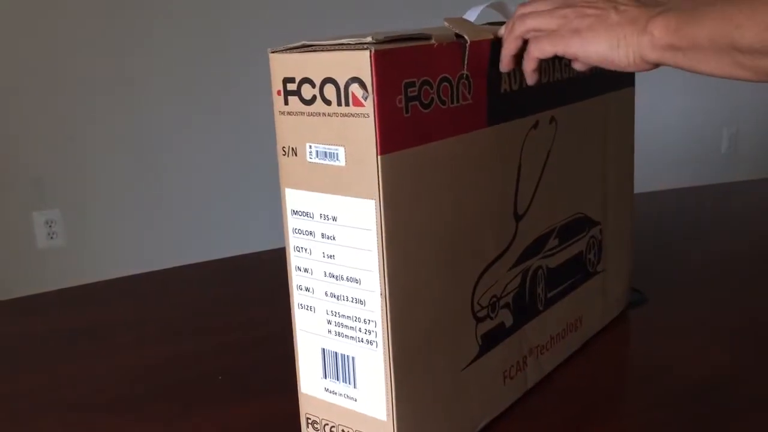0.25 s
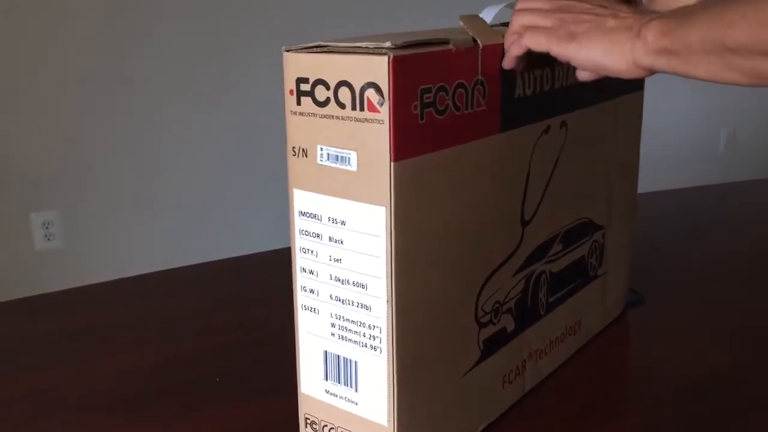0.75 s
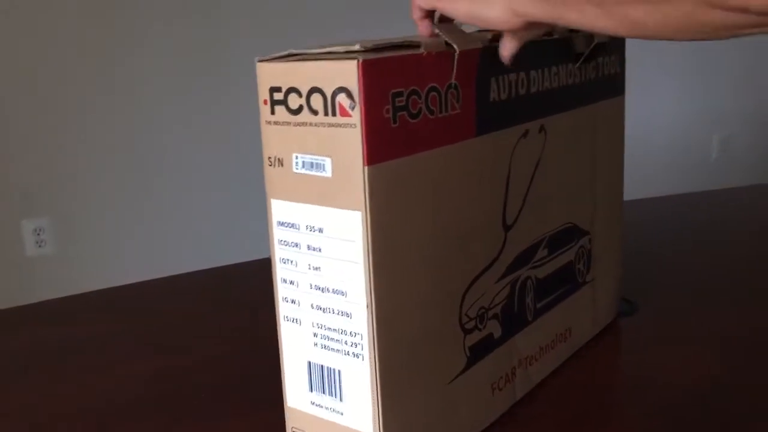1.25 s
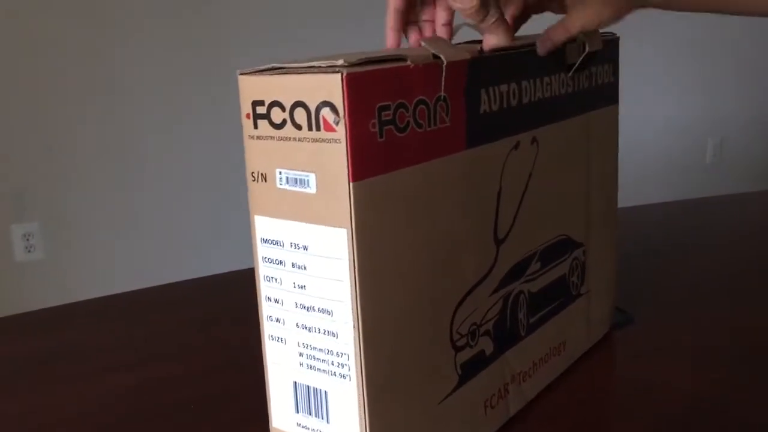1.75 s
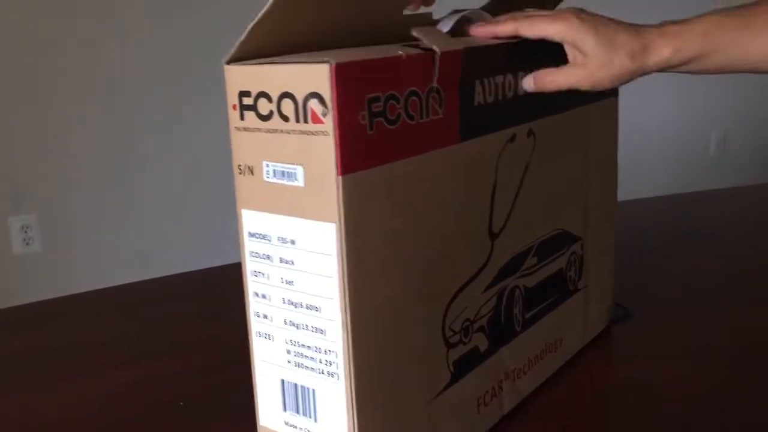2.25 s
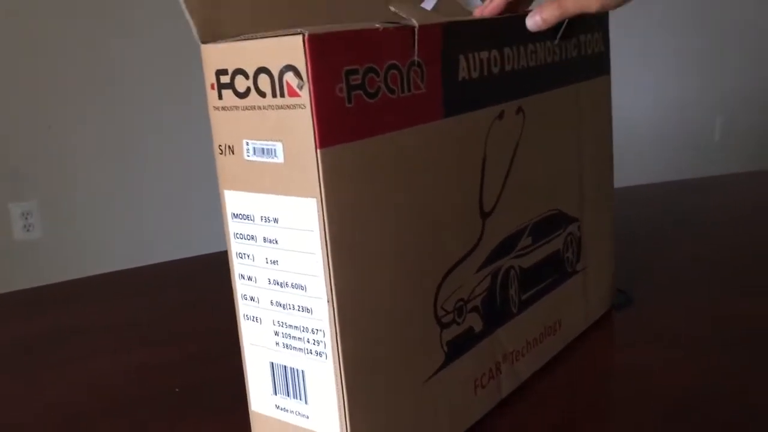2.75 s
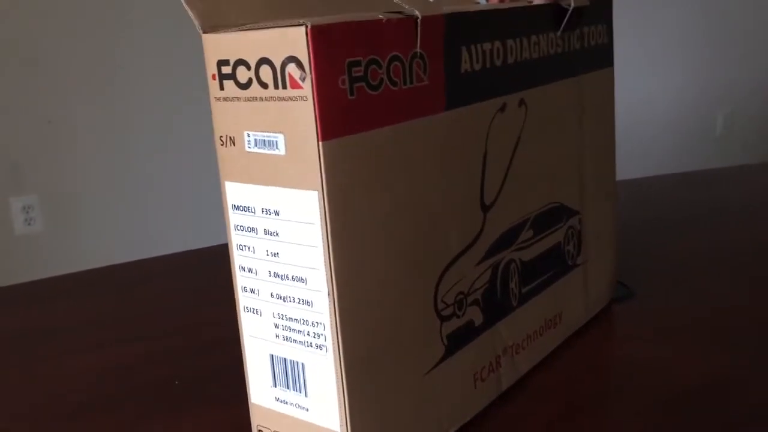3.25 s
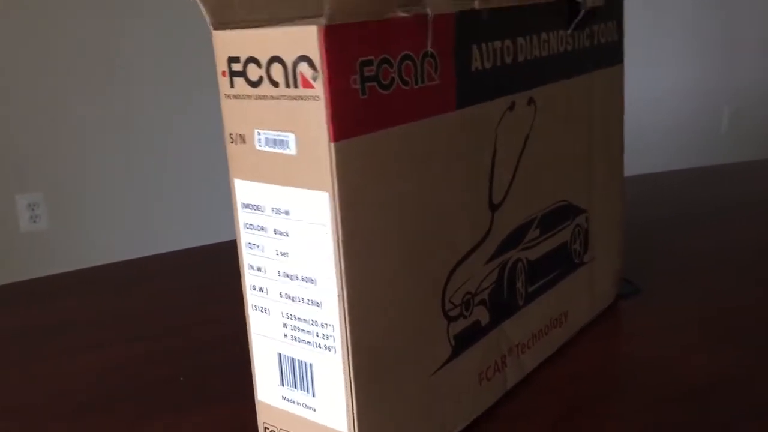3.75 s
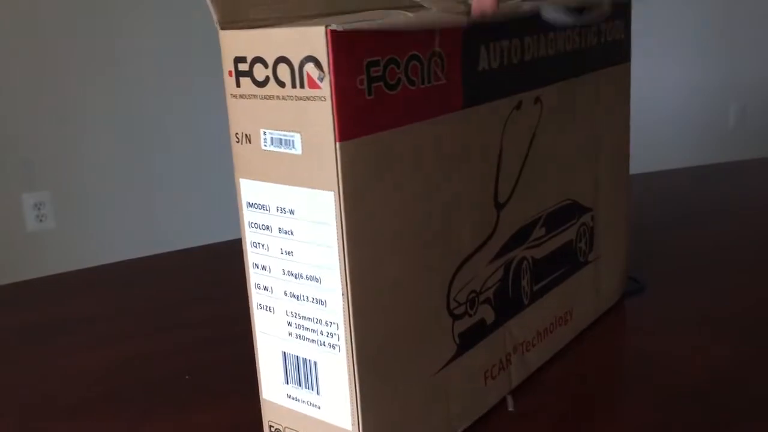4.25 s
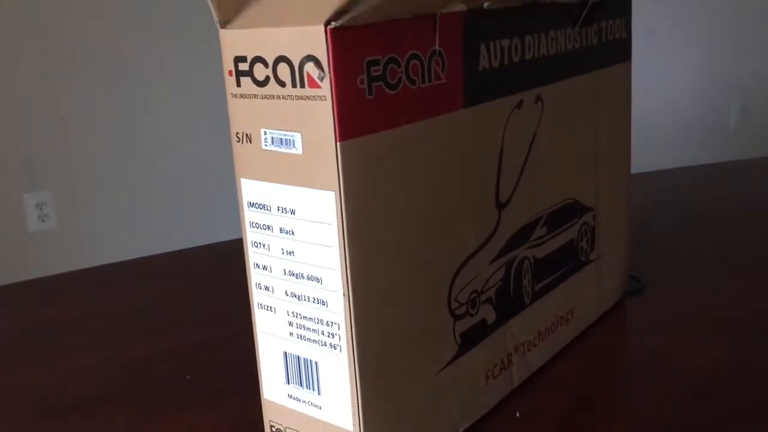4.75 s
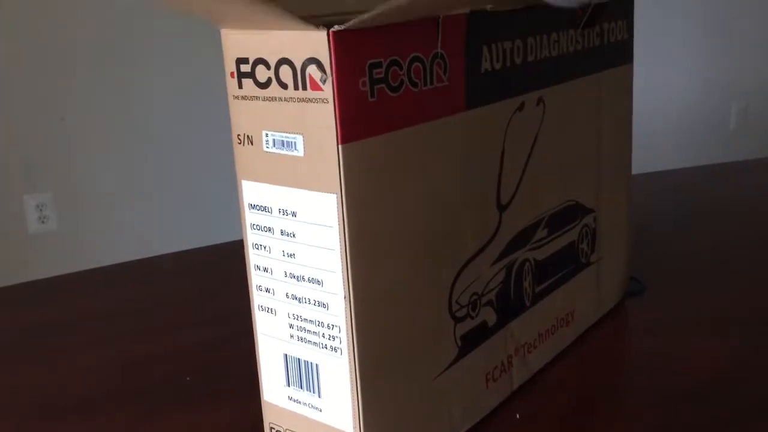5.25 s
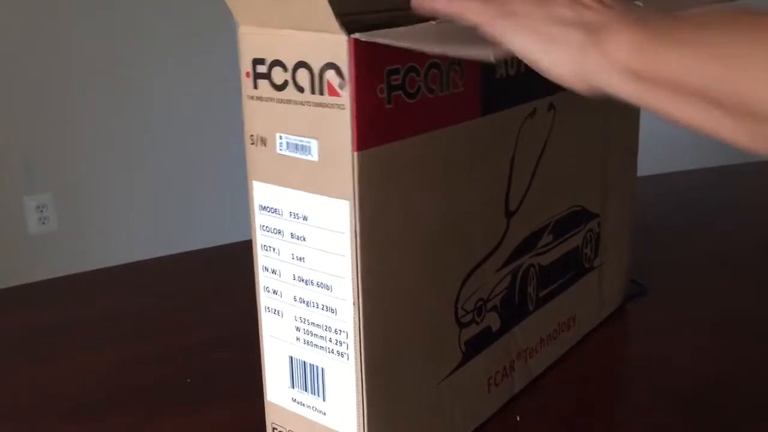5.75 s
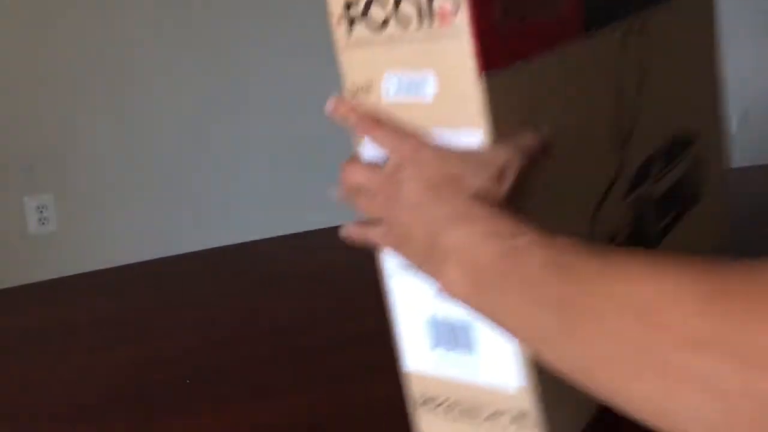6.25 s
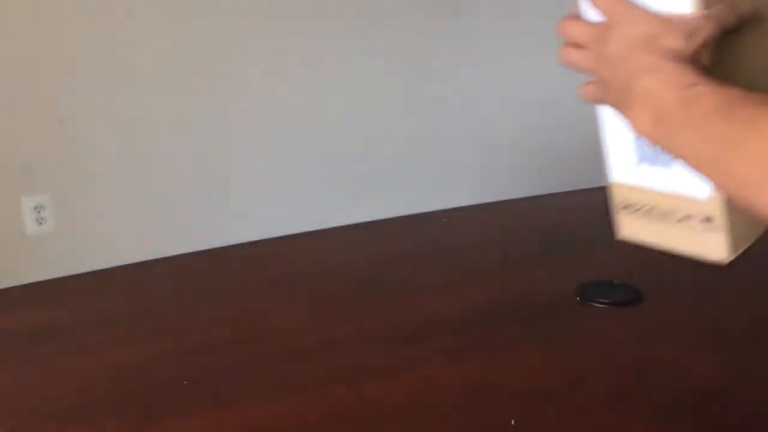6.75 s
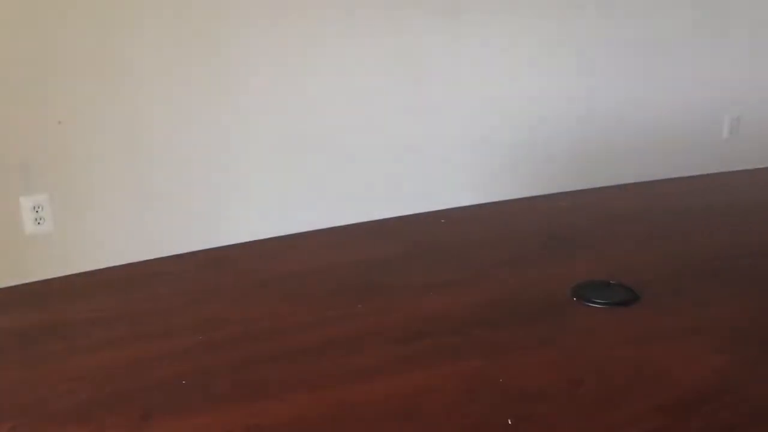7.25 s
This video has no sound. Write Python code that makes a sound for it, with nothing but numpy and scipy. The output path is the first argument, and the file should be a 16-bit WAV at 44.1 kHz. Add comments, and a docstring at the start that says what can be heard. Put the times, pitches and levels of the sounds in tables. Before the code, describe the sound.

Cardboard box being opened close by: faint fumbling, popping tab, rubbing and slapping flaps, then a droning scrape across a table and a final thump.

```python
"""Opening a cardboard carton

Hands open a large carton on a wooden table in a small, bare room. The tuck tab is torn free, flaps
scrape, creak and slap back, then the carton is dragged off the table. Blows and rubs drive its hollow
panels, stiff corrugated board and paper fibres, built from ringing tones, tiny clicks and coloured noise.
Levels in the tables are starting points: each layer adds its own trim."""
import sys
import numpy as np
from scipy import signal
from scipy.fft import rfft, irfft
from scipy.io import wavfile

SR = 44100
rng = np.random.default_rng(int(sys.argv[2]) if len(sys.argv) > 2 else 0)


def wrap_up_sound(samples):
    """Save the sound to the file named by the first command line argument, as 16-bit audio."""
    columns = np.atleast_2d(samples).T
    # keep every value between -1 and 1, then stretch to whole-number steps
    tamed = np.clip(columns, -1, 1)
    steps = np.round(tamed * 32767).astype(np.int16)
    wavfile.write(sys.argv[1], SR, steps)


N = 330309
TIME = np.arange(N) / SR
TOP_HZ = 15600  # nothing is heard above this pitch

# the board buckles or the tab tears: start_s, level_db, fibres_against_board_db, crumple_length_s,
# spot_pitch_hz
CRACK_EVENTS = [(0.102, -36, -25, .005, 970), (0.156, -31, -29, 0.0043, 1650),
                (0.234, -38, -24, 0.007, 860), (0.349, -30.5, -18, 0.0094, 1550),
                (0.571, -23.5, -7, 0.01, 620), (0.599, -19, -3, 0.004, 1460), (0.718, -25, 0, 0.0064, 950),
                (0.637, -27, -8, 0.0036, 1400), (0.752, -19.5, -7, 0.0043, 1560),
                (0.94, -23, -4, 0.0051, 1900), (0.989, -19, 0, 0.0073, 786), (1.124, -15, -1, 0.007, 1300),
                (1.143, -11, 0, 0.011, 1690), (1.263, -15, 1, 0.0077, 1710), (1.49, -15, -9.5, 0.017, 1030),
                (1.765, -18, -13, 0.017, 990), (1.93, -16.5, -7, 0.0083, 1580),
                (1.978, -5, -4, 0.012, 1635), (2.091, -24, -13, 0.008, 1290),
                (2.119, -3.5, -3, 0.0087, 1060), (2.15, -7.5, -7, 0.013, 1520),
                (2.429, -18.5, -3.5, 0.0048, 1260), (2.661, -17.5, -9, 0.0045, 1340),
                (3.045, -21, -20, 0.011, 1670), (3.077, -35, -18, .012, 1800),
                (3.138, -12, -12, 0.0056, 870), (3.262, -16.5, 2.5, 0.0037, 2230),
                (3.503, -6, -17, 0.03, 1620), (3.528, -1, -8, 0.003, 1580), (3.769, -14, -10, 0.0034, 2000),
                (3.91, -33, -4, 0.0048, 1710), (3.928, -19, -11, 0.0067, 1550),
                (4.121, -19, -7, 0.0026, 3610), (4.414, -27, -10, 0.006, 1350),
                (4.427, -19.5, -15, 0.0074, 790), (4.443, -16.5, -6, 0.012, 800),
                (4.567, -16.5, -6, 0.0058, 820), (4.606, -12, -6, 0.012, 496), (4.628, -9, -7, 0.011, 477),
                (4.688, -13.5, -20, 0.0086, 930), (4.794, -13, -23, 0.018, 1740),
                (4.913, -22.5, -13, 0.0089, 930), (4.956, -18.5, -4.5, 0.0035, 820),
                (5.054, -21, -17, 0.0098, 860), (5.126, -25, -5, 0.0093, 1890),
                (5.16, -24, -12, 0.003, 755), (5.571, -16.5, -6, 0.0043, 960),
                (5.633, -11, -10, 0.0039, 2000), (5.812, -1.5, -5.5, 0.0056, 555),
                (5.842, -5.5, -15, 0.0078, 690), (6.11, -16.5, -19, 0.0065, 470)]
# a finger or palm bumps or presses a hollow panel: start_s, level_db, panel_pitch_hz, push_length_s
THUMP_EVENTS = [(0.0, -22.5, 177, 0.0058), (0.046, -32, 160, 0.0042), (0.301, -30, 287, 0.0026),
                (0.336, -28.5, 240, 0.01), (0.609, -28, 208, 0.0023), (1.006, -13.5, 186, 0.0068),
                (1.296, -14.5, 206, 0.004), (1.745, -10, 144, 0.021), (2.249, -14, 230, 0.0099),
                (2.283, -12.5, 160, 0.0023), (2.718, -12.5, 130, 0.015), (2.778, -12, 160, 0.0053),
                (3.232, -6, 234, 0.0039), (3.519, -5, 210, .002), (3.543, -5, 152, 0.0098),
                (3.81, -16, 195, 0.014), (3.858, -10.5, 276, 0.012), (4.44, -17, 134, 0.0082),
                (4.624, -11, 238, 0.0078), (4.884, -16, 267, 0.014), (4.955, -10.5, 229, 0.0024),
                (5.467, -14, 225, 0.00091), (5.489, -12, 249, .004), (5.54, -10, 243, 0.03),
                (5.644, 0.5, 308, 0.0018), (6.124, -5, 226, 0.0031), (6.279, -7.5, 254, 0.0014),
                (6.331, -9, 287, 0.0028), (7.074, -0.5, 251, 0.02)]
# a flap or edge slaps flat: start_s, level_db, flap_pitch_hz
SLAP_EVENTS = [(5.64, -1.5, 903), (5.688, -4, 920), (5.792, -6.5, 804), (5.822, 2, 573), (5.885, 0, 700),
               (7.472, 0, 620)]


def blows():
    """Cracks, thumps and slaps share the carton's body and differ in how they drive it."""
    out = np.zeros(N)
    # where a crack lands shifts the pitch of the panel it shakes, in octaves
    shifts_oct = rng.uniform(-0.768, 0.48, len(CRACK_EVENTS))
    for (s, db, fibre_db, length_s, spot_hz), shift_oct in zip(CRACK_EVENTS, shifts_oct):
        panel_hz = 211 * 2 ** shift_oct
        add(out, s, blow(s, clack_db=db, boom_db=db - 7.5, crack_db=db + fibre_db,
                         panel_hz=panel_hz, spot_hz=spot_hz, length_s=length_s))
    # a thump is soft and slow: mostly panel
    for s, db, panel_hz, push_s in THUMP_EVENTS:
        add(out, s, blow(s, clack_db=db - 11, boom_db=db, crack_db=db - 23,
                         panel_hz=panel_hz, spot_hz=570, length_s=0.005 + push_s, push_s=push_s))
    # a slap is quick and dull: mostly board, hardly any fibres
    for s, db, flap_hz in SLAP_EVENTS:
        add(out, s, blow(s, clack_db=db, boom_db=db - 5, crack_db=db - 50,
                         panel_hz=235, spot_hz=flap_hz, length_s=0.006))
    return out


# tone colour of the stiff board: pitch_hz, relative_level_db
BOARD_COLOUR = [(200, -18.5), (400, -1.5), (600, 5), (900, 0), (1500, 5.5), (2100, -0.5), (3000, -9.5),
                (4500, -16), (9000, -48.5)]
# tone colour of the paper fibres: pitch_hz, relative_level_db
FIBRE_COLOUR = [(1200, -40), (2500, 16), (3800, 16.5), (4900, 6.5), (6000, 12.5), (7400, 5.5), (9000, 8.5),
                (10300, 0), (11800, -4), (15500, 3)]
# ringing tones of a free flap: pitch_hz, relative_level_db, time_to_fade_60_db_s
FLAP_TONES = [(466, 4.5, 0.17), (550, 6.5, 0.2), (604, 25, 0.023), (875, 17.5, 0.077), (1060, 2, 0.04),
              (1240, 9, 0.084), (1640, -27, 0.039)]
# how freely the flaps ring, little while tucked in: time_s, level_db
FLAP_LOOSENESS = [(0, -18), (1.7, -7), (2.8, -22), (3.5, -33), (4.5, -6.5), (5.3, -6), (5.65, -1),
                  (5.9, -14), (6.2, -26)]


def blow(s, clack_db, boom_db, crack_db, panel_hz, spot_hz, length_s, push_s=0,
         board_db=-1, panel_db=-2, fibre_db=-1, flap_db=-1, spot_db=-6, spot_t60_s=0.03):
    """One blow clacks in the board, booms in the panels and cracks in the surface."""
    t = np.arange(SR // 5) / SR
    spray = crumple(length_s)
    board = undb(board_db) * unit(through(spray, colour(BOARD_COLOUR)))
    fibre = undb(fibre_db) * unit(through(crumple(length_s), colour(FIBRE_COLOUR)))
    # the struck spot gives the clack its pitch; a free flap rings on
    spot = undb(spot_db) * unit(through(spray, mode(spot_hz, spot_t60_s, t)))
    looseness = undb(flap_db + np.interp(s, *np.transpose(FLAP_LOOSENESS)))
    flap = looseness * unit(through(spray, ring(FLAP_TONES, detune=0.014, scatter_db=4.5)))
    clack = undb(clack_db) * (board + spot + flap)
    return clack + undb(crack_db) * fibre + undb(boom_db + panel_db) * boom(panel_hz, push_s)


# ringing tones of the hollow carton: pitch_hz, relative_level_db, time_to_fade_60_db_s
PANEL_TONES = [(143.3, -2, 0.63), (156, -26, 0.44), (199, 7, 0.063), (215, 9, 0.13), (260.5, 11, 0.11),
               (279.4, -30, 0.14), (340, -10, 0.029), (372, 2.5, 0.12)]


def boom(hz, push_s, hollow_db=-6, t60_s=0.034, sag_share=0.24, sag_s=0.033, linger=3):
    """A pushed panel sinks in pitch as it relaxes and wakes the carton; a slow push swells and lingers."""
    t = np.arange(SR // 5) / SR
    # a bent clock makes the pitch start high and settle
    sagging = (1 - sag_share) * t + sag_share * sag_s * (1 - np.exp(-t / sag_s))
    panel = unit(mode(hz, t60_s + linger * push_s, sagging))
    swing = panel + undb(hollow_db) * ring(PANEL_TONES, detune=0.027, scatter_db=0.0)
    swell = (1 - np.exp(-t / max(push_s, 1 / SR))) * np.cos(np.pi / 2 * t / t[-1])
    body = signal.butter(2, [100, 480], "bandpass", fs=SR, output="sos")
    return unit(signal.sosfilt(body, swing * swell))


# a knuckle or a stiff edge knocks once, cleanly: start_s, knock_level_db, knock_pitch_hz,
# boom_level_db, panel_pitch_hz
KNOCK_EVENTS = [(0.157, -32, 960, -38, 221), (0.236, -33, 720, -33, 210), (0.6, -22, 1400, -30, 230),
                (0.754, -19, 1040, -32, 220), (0.944, -19, 570, -27, 209), (0.992, -16.5, 880, -21, 198),
                (1.128, -13.5, 1680, -31, 210), (1.148, -10.5, 1350, -16.5, 223),
                (1.265, -15, 1260, -21, 215), (1.7233, -9.5, 900, -14.5, 219), (2.119, -9, 1230, -23, 201),
                (2.5445, -14, 1170, -46, 228), (2.764, -12, 1050, -6, 261), (3.5285, -5, 1210, -9.5, 186),
                (4.121, -16, 1470, -25, 256), (4.509, -12, 530, -14, 230), (4.5406, -10.5, 517, -19, 243),
                (4.628, -20, 1900, -30, 230), (4.638, -15, 1560, -29, 230), (4.958, -30, 890, -11.5, 343),
                (5.634, -13, 2010, -24, 250), (5.689, -9, 950, -15, 243), (5.7941, 0.5, 500, -3.5, 280),
                (5.8851, -10.5, 1220, -8.5, 253)]
# tone colour of the paper scuffing after a knock: pitch_hz, relative_level_db
SCUFF_COLOUR = [(300, -14), (700, -6.5), (1200, -1.5), (2000, -10), (3200, -24), (9000, -40)]


def knocks(cycles=15, overtone=1.68, overtone_db=-8, board_db=-6, contact_s=0.0035,
           scuff_db=-7.5, scuff_s=0.022):
    """One firm contact: the spot rings hollow over its panel's falling boom, and the paper scuffs."""
    t = np.arange(SR // 5) / SR
    out = np.zeros(N)
    for s, db, hz, boom_db, panel_hz in KNOCK_EVENTS:
        high_hz = hz * overtone
        spot = unit(mode(hz, cycles / hz, t) + undb(overtone_db) * mode(high_hz, cycles / high_hz, t))
        contact = unit(through(crumple(contact_s), colour(BOARD_COLOUR)))
        scuff = unit(through(crumple(scuff_s, rise_share=0.22), colour(SCUFF_COLOUR)))
        knock = spot + undb(board_db) * contact + undb(scuff_db) * scuff
        add(out, s, undb(db) * knock + undb(boom_db) * boom(panel_hz, 0))
    return out


# paper fibres snapping: start_s, level_db, ping_pitch_hz
SNAP_EVENTS = [(0.601, -46, 2640), (0.637, -40, 3300), (0.753, -30, 2420), (0.945, -45, 2450),
               (0.992, -23, 3840), (1.1135, -40, 3200), (1.127, -46, 3240), (1.1465, -36, 2500),
               (1.159, -24, 2130), (1.2462, -29, 2460), (1.265, -18.5, 5500), (1.272, -35, 3600),
               (1.284, -34, 4600), (1.763, -25, 4070), (1.977, -32, 2100), (2.119, -28, 2360),
               (2.183, -26, 4400), (2.4305, -36, 2590), (3.265, -29, 4200), (3.531, -17, 5400),
               (3.6024, -17, 8700), (3.77, -32, 2400), (3.914, -36, 2300), (3.993, -31, 2600),
               (4.121, -25.5, 3570), (4.508, -27.5, 2420), (4.5405, -29.5, 2030), (4.566, -27, 2400),
               (4.629, -32, 3400), (4.651, -35, 2700), (4.697, -24.5, 2030), (4.824, -37, 3000),
               (4.8396, -25, 9000), (5.8063, -16, 6540), (5.816, -31, 4960), (5.843, -32, 5500)]


def snaps(level_db=3.5, ping_db=-5, cycles=11, length_s=0.0013):
    """Single fibres and tape edges let go with a bright tick and a short ping of their own pitch."""
    out = np.zeros(N)
    t = np.arange(SR // 5) / SR
    tick_colour = colour([(1000, -46), (3500, -4.0), (7000, -4.5), (8700, -5), (10300, -6.5),
                          (13000, -4.5), (15500, -28)])
    for s, db, hz in SNAP_EVENTS:
        tick = unit(through(crumple(length_s), tick_colour))
        ping = unit(mode(hz, cycles / hz, t))
        add(out, s, undb(db + level_db) * unit(tick + undb(ping_db) * ping))
    return out


# card rubbing on card and skin, one row a gesture: start_s, end_s, level_db,
# pressure_change_along_it_db, fibres_against_board_db, creak_pitch_hz
RUB_GESTURES = [(0.0, 0.107, -69.5, -30, -15, 1150), (0.29, 0.393, -71, -10, -8, 1390),
                (0.47, 0.56, -70.5, -5, -24, 1020), (0.589, 0.644, -48.5, -1, -17, 1380),
                (0.757, 0.878, -53, -9, -5.5, 1460), (0.922, 0.95, -50.5, 4, -15, 2430),
                (0.96, 1.06, -61, -9, -9, 760), (1.07, 1.125, -60, 22, -15, 1210),
                (1.117, 1.195, -47, 3.5, 1, 1640), (1.225, 1.302, -47.5, -3, -1.5, 1370),
                (1.311, 1.478, -53.5, -9, -10, 1430), (1.5, 1.664, -61, -3, -6.5, 1260),
                (1.694, 1.93, -51, 2.5, -7.5, 997), (1.915, 2.148, -48, 8, -4.5, 1470),
                (2.105, 2.276, -48, -10, 1, 1177), (2.316, 2.423, -65.5, 4, 8.5, 1670),
                (2.525, 2.72, -58.5, 10.5, -4, 1540), (2.76, 2.903, -63, 7, 2.5, 1030),
                (3.025, 3.1, -53, -10, -12, 1640), (3.13, 3.316, -56.5, -3, -5, 1104),
                (3.41, 3.517, -50, 11, -27, 1420), (3.496, 3.775, -45.5, -6, -1.5, 1874),
                (3.787, 3.914, -57, 15.5, -1.5, 1450), (3.915, 4.043, -51.5, 0, -1, 1575),
                (4.159, 4.221, -54, 1.5, -5, 1186), (4.28, 4.38, -71.5, 3, -16, 1510),
                (4.418, 4.483, -52.5, -2, -2, 1100), (4.493, 4.53, -52, -4, 0, 1020),
                (4.56, 4.85, -50, -3, -7, 1095), (4.87, 5.1, -56.5, 2, 0.5, 846),
                (5.11, 5.18, -57, -2.5, -2, 1880), (5.391, 5.48, -61.5, 7.5, 7.5, 1880),
                (5.49, 5.638, -46.5, 1, -8.5, 1450), (5.634, 5.743, -47, -6, -38, 950),
                (5.748, 5.93, -43, 0.5, -7.5, 1330), (5.94, 6.1, -55, -12, -32, 1230)]
RUB_ATTACK_S, RUB_RELEASE_S = 0.013, 0.011


def pressure():
    """Each rub takes hold, presses harder or eases, and lets go: drives for board and fibres, and pitch."""
    board, fibre = np.zeros(N), np.zeros(N)
    pitch = np.full(N, float(RUB_GESTURES[0][-1]))
    for start, end, db, change_db, fibre_db, hz in RUB_GESTURES:
        length_s = end - start
        t = np.arange(int((length_s + 8 * RUB_RELEASE_S) * SR)) / SR
        along = np.minimum(t / length_s, 1)
        attack = np.minimum(t / RUB_ATTACK_S, 1)
        release = np.exp(-np.maximum(t - length_s, 0) / RUB_RELEASE_S)
        drive = undb(db + change_db * (along - .5)) * attack * release
        add(board, start, drive)
        add(fibre, start, drive * undb(fibre_db))
        pitch[TIME >= start] = hz
    return board, fibre, pitch


# tone colours of panels, board and fibres under a rub: pitch_hz, relative_level_db
RUB_PANEL_COLOUR = [(30, -38), (60, -4.5), (100, -1), (130, -2.5), (220, -0.5), (300, 4), (420, 3),
                    (700, -52)]
RUB_BOARD_COLOUR = [(250, 2), (450, 8), (700, 1), (1000, 2.5), (1550, 3), (2200, 9.5), (3000, -29.5),
                    (4500, -5), (9000, -53)]
RUB_FIBRE_COLOUR = [(1500, 3.5), (2700, 5.5), (4000, 0), (4900, -5.5), (6000, -1.5), (7400, -3.5),
                    (9000, -2), (10300, -7.5), (11800, -1.5), (15500, -8)]


def rubbing(board, fibre, pitch, board_db=-6, creak_db=-2, panel_db=-4, fibre_db=-2,
            catch_db=4, hiss_db=-3, flex_db=2):
    """Card catches and slips in small jerks, the panels flex with it and smooth paper hisses."""
    grip = undb(catch_db * walk(60))
    catches = slips(rate=1500, spread_db=3.5) * grip
    hiss = undb(hiss_db) * rng.standard_normal(N)
    panel = board * undb(flex_db * walk(31))
    creaking = creaks(board, pitch, rate=200, spread_oct=0.637, cycles=44, wander_oct=0.19, spread_db=10)
    return (undb(board_db) * through(catches * board, colour(RUB_BOARD_COLOUR))
            + undb(creak_db) * creaking
            + undb(panel_db) * through(catches * panel, colour(RUB_PANEL_COLOUR))
            + undb(fibre_db) * through((catches + hiss) * fibre, colour(RUB_FIBRE_COLOUR)))


def crackling(board, fibre, level_db=-5.5, crisp_db=-12, rate=80, tick_db=-7, tick_hz=5200):
    """Flutes buckle one by one under the rubbing and fibres part, each with a tick of its own pitch."""
    buckles = slips(rate=rate, spread_db=2.0) * board * undb(level_db)
    crisp_board = colour(BOARD_COLOUR) + undb(crisp_db) * colour(FIBRE_COLOUR)
    ticks = creaks(fibre, tick_hz, rate=340, spread_oct=1.45, cycles=24, wander_oct=0.15, spread_db=2.5)
    return through(buckles, crisp_board) + undb(tick_db) * ticks


# the carton dragged over the table: time_s, scrape_level_db, drone_level_db, hiss_level_db
DRAG_LEVELS = [(6.1, -44, -52, -87), (6.11, -56, -40, -80), (6.122, -50, -47, -94), (6.196, -40, -45, -58),
               (6.25, -37, -38.5, -49), (6.308, -42, -39, -57), (6.37, -38.5, -39, -50.5),
               (6.47, -37, -34, -46.5), (6.652, -36, -37, -44.5), (6.692, -32.5, -31.5, -41.5),
               (6.82, -44, -50, -54.5), (6.892, -47, -43.5, -60), (6.928, -39, -31.5, -56),
               (6.966, -38, -38.5, -48.5), (7.008, -47, -40, -63), (7.04, -42.5, -39, -51.5),
               (7.078, -29.5, -31, -42.5), (7.114, -32.5, -27.5, -44), (7.194, -50.5, -43, -67),
               (7.238, -38.5, -48, -55), (7.28, -36, -41.5, -49.5), (7.318, -33.5, -32.5, -46),
               (7.442, -31.5, -31.5, -42), (7.474, -25, -36, -36), (7.49, -28, -34, -37)]
# tone colours of the drone, the scrape, the hissing paper and a sliding palm: pitch_hz, relative_level_db
DRONE_COLOUR = [(30, -50), (70, -10), (105, -14), (160, 0.5), (220, 1), (290, -0.5), (340, 3), (400, -3),
                (600, -10), (1000, -39)]
SCRAPE_COLOUR = [(300, -4), (520, 6), (800, -1), (1080, -2.5), (1400, -1), (1900, 1), (2800, -5.5),
                 (4600, -36), (9000, -78)]
HISS_COLOUR = [(1500, -16), (3000, 3), (4500, -0.5), (5000, -6), (6000, -3), (7500, -9), (9300, -8),
               (10300, -15), (11800, -11), (15500, -18)]
PALM_SLIDE_COLOUR = [(1500, -6), (2800, -20), (3700, 2), (4700, -6), (5200, -8), (9000, -29.5)]


def dragging(scrape_db=-3.5, creak_db=-6.5, panel_db=-4.0, shudder_db=-11, hiss_db=2.5, judder_db=1.0):
    """The carton's bottom judders over wood, its paper hisses and its hollow body drones and shudders."""
    times, *levels = np.transpose(DRAG_LEVELS)
    scrape, panel, hiss = (undb(np.interp(TIME, times, db)) * (TIME > times[0]) for db in levels)
    friction = slips(rate=7000, spread_db=2.0) * undb(judder_db * walk(70))
    creaking = creaks(scrape, 1600, rate=300, spread_oct=0.896, cycles=33, wander_oct=0.2, spread_db=5)
    shudder = creaks(panel, 216, rate=90, spread_oct=0.85, cycles=4.0, wander_oct=0.082,
                     spread_db=7.0, size=4096)
    # a palm slides on the carton's side as it takes hold
    palm = friction * swish(6.205, db=-46, length_s=0.15)
    return (undb(scrape_db) * through(friction * scrape, colour(SCRAPE_COLOUR))
            + undb(creak_db) * creaking
            + singing(friction, scrape, panel)
            + undb(panel_db) * through(friction * panel, colour(DRONE_COLOUR))
            + undb(shudder_db) * shudder
            + undb(hiss_db) * through(friction * hiss, colour(HISS_COLOUR))
            + through(palm, colour(PALM_SLIDE_COLOUR)))


# the panel that rings most changes as the weight shifts: time_s, pitch_hz, level_against_drone_db
LOADED_PANEL = [(6.12, 184, 0), (6.3, 196, -11), (6.48, 297, -10.5), (6.74, 280, 0), (6.86, 258, -17),
                (6.93, 245, -4.5), (7.1, 228, -15), (7.25, 234, -5), (7.35, 220, -4), (7.49, 232, -10)]
# the low hum of the hollow carton on the table: time_s, level_db
HUM_LEVELS = [(6.1, -53), (6.25, -50), (6.39, -56), (6.44, -40), (6.55, -52), (6.66, -41), (6.82, -43),
              (6.92, -66), (7.07, -52), (7.2, -53), (7.3, -45), (7.42, -47), (7.49, -58)]
# once tipped, the carton rides on one edge, which sings: time_s, pitch_hz, level_against_scrape_db
SINGING_EDGE = [(6.45, 1290, -15), (6.7, 1260, -5.5), (6.95, 1220, 0.5), (7.1, 1240, -17), (7.29, 1310, 0),
                (7.37, 1210, -1), (7.49, 1200, -5)]


def singing(friction, scrape, panel, edge_width_hz=147, overtone=2.1, overtone_db=-6.5, wander_oct=.07):
    """Friction rings the hollow, the loaded panel and the edge; panel and edge shift pitch as it tips."""
    times, hz, db = np.transpose(LOADED_PANEL)
    panel_drive = friction * panel * undb(np.interp(TIME, times, db))
    drone = resonate(panel_drive, np.interp(TIME, times, hz), width_hz=36)

    times, db = np.transpose(HUM_LEVELS)
    hum_drive = friction * undb(np.interp(TIME, times, db)) * (TIME > times[0])
    hum = resonate(hum_drive, 143, width_hz=22)

    times, hz, db = np.transpose(SINGING_EDGE)
    edge_drive = friction * scrape * undb(np.interp(TIME, times, db))
    edge_hz = np.interp(TIME, times, hz) * 2 ** (wander_oct * walk(20))
    edge = resonate(edge_drive, edge_hz, edge_width_hz)
    edge_overtone = resonate(edge_drive, edge_hz * overtone, edge_width_hz * overtone)
    return drone + hum + edge + undb(overtone_db) * edge_overtone


# light strokes of skin over the paper: middle_s, level_db, length_s
STROKE_EVENTS = [(0.87, -52, 0.054), (2.883, -58, 0.095), (3.494, -52.5, 0.065), (4.21, -59, 0.043),
                 (4.32, -64, 0.037), (4.433, -54, 0.044), (4.578, -50, 0.043), (4.807, -47, 0.048),
                 (5.026, -55, .1), (5.145, -53, 0.059), (5.434, -52.5, 0.16), (6.902, -50, 0.1)]
# tone colour of those strokes: pitch_hz, relative_level_db
SKIN_COLOUR = [(1500, -21), (3500, -2.5), (7000, -13.5), (9000, -2), (10400, -8), (12000, -3.5),
               (15500, -5.5)]


def strokes():
    """Fingertips brush the smooth liner with a short airy swish."""
    swell = sum(swish(*row) for row in STROKE_EVENTS)
    return through(swell * rng.standard_normal(N), colour(SKIN_COLOUR))


# standing waves between the walls: pitch_hz, relative_level_db, time_to_fade_60_db_s
STANDING_WAVES = [(134, 7, 0.38), (167, 0.5, 0.73), (194.4, 3, 1), (221.5, 1.5, 0.39), (282, -8, 0.2)]


def room(x, wet_db=-4.5, standing_db=-29, count=10):
    """As the hands move, one pattern of echoes gives way to the next; the standing waves stay."""
    t = np.arange(SR // 2) / SR
    standing = unit(sum(undb(db) * mode(hz, t60, t) for hz, db, t60 in STANDING_WAVES))
    out = x + undb(standing_db) * through(x, standing)
    place = np.linspace(0, count - 1, N)
    for k in range(count):
        near = np.abs(place - k) < 1
        share = np.cos(np.pi / 2 * (place[near] - k))
        wet = signal.fftconvolve(x[near] * share, echoes())
        add(out, TIME[near][0], undb(wet_db) * wet)
    return out


def echoes(treble_db=-1, split_hz=3000, build_s=0.0014, low_t60_s=0.44, high_t60_s=0.4):
    """Bare walls answer within milliseconds with fading noise; the treble dies first."""
    t = np.arange(int(.6 * SR)) / SR
    scatter = rng.standard_normal(len(t)) * (1 - np.exp(-(t / build_s) ** 2))
    low = signal.sosfiltfilt(signal.butter(2, split_hz, fs=SR, output="sos"), scatter)
    low_decay = np.exp(-np.log(1000) * t / low_t60_s)
    high_decay = np.exp(-np.log(1000) * t / high_t60_s)
    tail = low * low_decay + undb(treble_db) * (scatter - low) * high_decay
    return tail / np.linalg.norm(scatter * low_decay)


# tone colour of the still air in the room: pitch_hz, relative_level_db
AIR_COLOUR = [(25, -35), (60, 8), (110, -5.5), (170, 7.5), (300, -8), (600, -12), (1700, -7), (2600, -14.5),
              (6000, -19.5), (15500, -25.5)]


def still_air(level_db=-66.5):
    """Steady noise, coloured as the faint sound of still air."""
    return undb(level_db) * through(rng.standard_normal(N), colour(AIR_COLOUR))


def slips(rate, spread_db, size=N):
    """Tiny stick-slip clicks, about rate a second, of uneven strength and either sign, rms one."""
    chance = rng.random(size) * SR / rate
    where = np.flatnonzero(chance < 1)
    strength = 2 * chance[where] - 1
    sign = (-1) ** (where % 2)
    clicks = np.zeros(size)
    clicks[where] = sign * undb(2 * spread_db * strength * np.abs(strength))
    return unit(clicks) * np.sqrt(size)


def crumple(length_s, size=SR // 5, rise_share=0.92, spread_db=1):
    """A contact and the flutes giving way after it: a spray of clicks that swells and dies."""
    age = np.arange(size) / SR / max(length_s, .0005)
    swell = np.exp(-age) * (1 - np.exp(-age / rise_share))
    return unit(slips(rate=8000, spread_db=spread_db, size=size) * swell)


def creaks(drive, centre_hz, rate, spread_oct, cycles, wander_oct, spread_db,
           wander_rate=14, count=6000, size=1536):
    """Each slip rings another patch of card for a few cycles; pitch wanders as the contact moves."""
    chance = rng.uniform(-1, 1, (count, 4))
    centre = centre_hz * 2 ** (wander_oct * walk(wander_rate))
    t = np.arange(size) / SR
    out = np.zeros(N)
    for k, (late, high, strong, side) in enumerate(chance[:int(rate * N / SR)]):
        at = int(np.clip((k + late) / rate * SR, 0, N - 1))
        if drive[at] > 0:
            hz = min(centre[at] * 2 ** (spread_oct * high), TOP_HZ)
            strength = drive[at] * np.sign(side) * undb(spread_db * strong)
            add(out, at / SR, strength * unit(mode(hz, cycles / hz, t)))
    # keep the level the same whatever the rate and spread
    return out * np.sqrt(SR / rate / np.mean(undb(spread_db * chance[:, 2]) ** 2))


def swish(s, db, length_s):
    """The rounded swell of skin sliding over paper, centred on a time."""
    return undb(db) * np.maximum(1 - np.abs((TIME - s) / length_s) * 2, 0) ** .5


def mode(hz, t60, t):
    """One dying oscillation; it builds within half a cycle."""
    decay = np.exp(-np.log(1000) * t / t60)
    return np.cos(2 * np.pi * hz * t) * decay * (1 - np.exp(-2 * np.pi * hz * t))


def ring(modes, detune, scatter_db):
    """Decaying tones, with chance in each one's level, pitch and sign for every contact."""
    t = np.arange(SR // 5) / SR
    out = np.zeros(len(t))
    for hz, db, t60 in modes:
        louder, higher, side = rng.uniform(-1, 1, 3)
        out += np.sign(side) * undb(db + scatter_db * louder) * mode(hz * (1 + detune * higher), t60, t)
    return unit(out)


def resonate(x, hz, width_hz):
    """A resonance whose pitch may move; it keeps the power of a broad drive."""
    turn = np.exp(2j * np.pi * np.cumsum(hz * np.ones(N)) / SR)
    pole = np.exp(-2 * np.pi * width_hz / SR)
    # shift the pitch down to zero, smooth twice, shift back up
    smooth = x / turn
    for _ in range(2):
        smooth = signal.lfilter([1 - pole], [1, -pole], smooth)
    return np.real(turn * smooth) * 2 / np.sqrt(1 - pole)


def walk(rate):
    """Smooth, bounded chance, rate steps a second; it dips further than it rises."""
    steps = rng.uniform(-2.88, 1.96, N // 20)
    return np.interp(TIME * rate, np.arange(len(steps)), steps)


def colour(points, size=4096):
    """A short filter of unit energy with the given spectrum, starting without delay."""
    hz, db = np.transpose(points)
    bins = np.maximum(np.arange(size // 2 + 1) * SR / size, 1)
    gain = undb(np.interp(np.log(bins), np.log(hz), db))
    # folding the cepstrum forward in time puts the energy at the start
    cepstrum = irfft(np.log(gain))
    cepstrum[1:size // 2] *= 2
    cepstrum[size // 2 + 1:] = 0
    return unit(irfft(np.exp(rfft(cepstrum)))[:size // 2])


def through(x, response):
    """Pass a sound through a filter response, keeping its length."""
    return signal.oaconvolve(x, response)[:len(x)]


def add(track, s, sound):
    """Mix a sound into a track at a time."""
    start = int(np.clip(s * SR, 0, N - 1))
    track[start:start + len(sound)] += sound[:N - start]


def unit(x):
    """Scale to an energy of one."""
    return x / np.sqrt(np.sum(x ** 2) + 1e-18)


def undb(db):
    """Decibels to gain."""
    return 10 ** (np.asarray(db) / 20)


def scene():
    """The carton in its room, over faint still air."""
    board, fibre, pitch = pressure()
    contacts = blows() + knocks() + snaps()
    rubs = rubbing(board, fibre, pitch) + crackling(board, fibre) + strokes()
    carton = contacts + rubs + dragging()
    return (room(carton) + still_air())[None]


def record(dry):
    """The phone thins the deepest bass and cuts the top."""
    thinned = signal.sosfilt(signal.butter(2, 38, "highpass", fs=SR, output="sos"), dry)
    return signal.sosfilt(signal.ellip(10, .2, 80, TOP_HZ, fs=SR, output="sos"), thinned)


dry = scene()
out = record(dry)
wrap_up_sound(out)
```